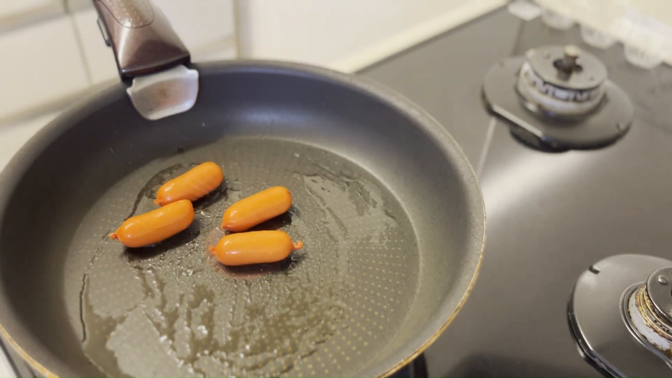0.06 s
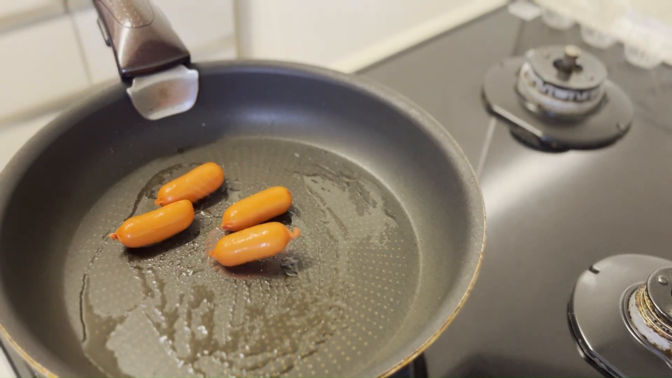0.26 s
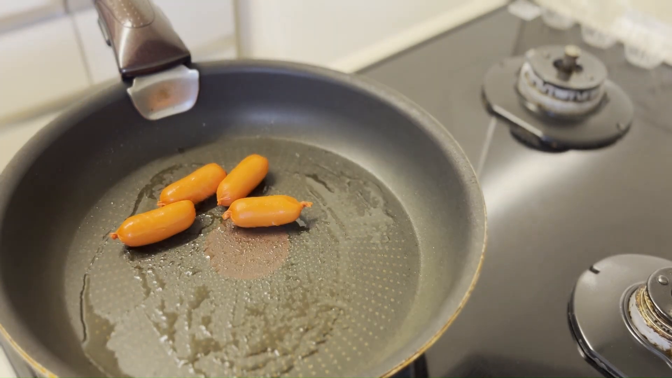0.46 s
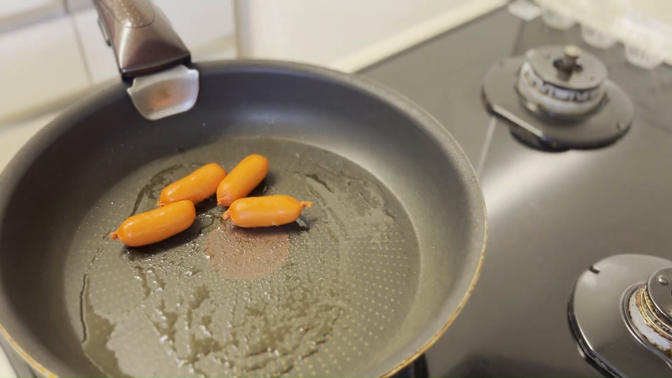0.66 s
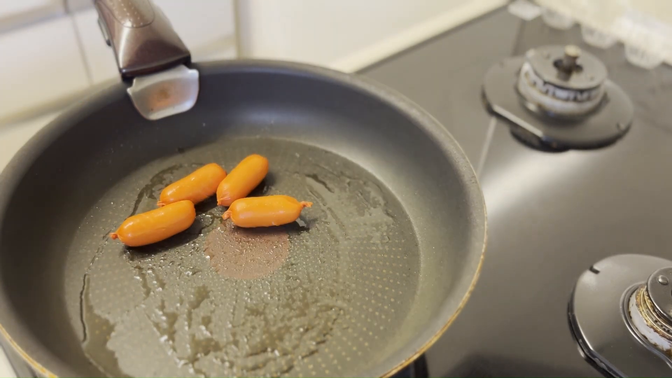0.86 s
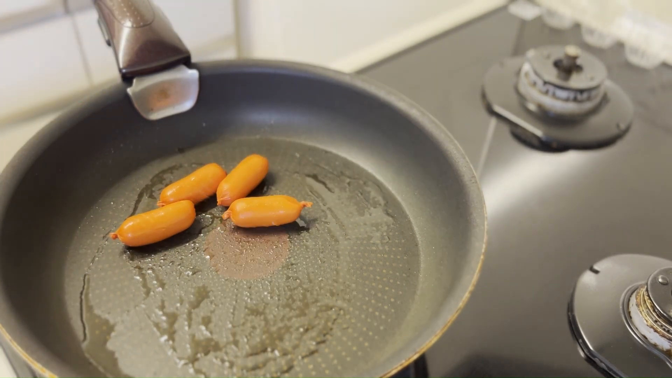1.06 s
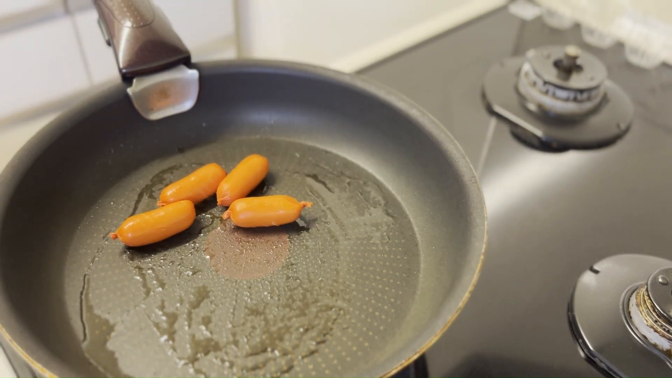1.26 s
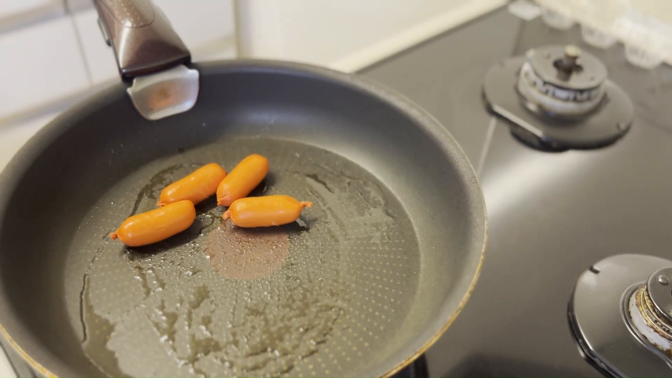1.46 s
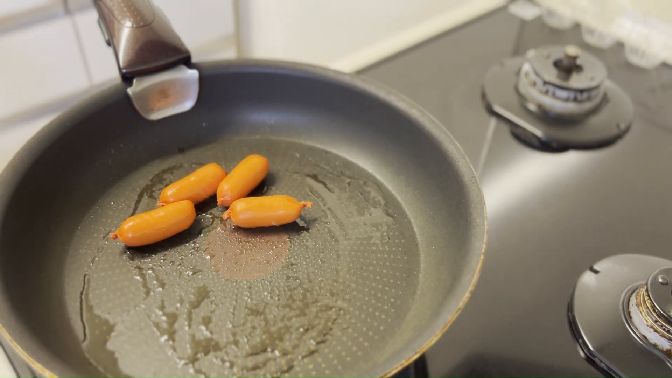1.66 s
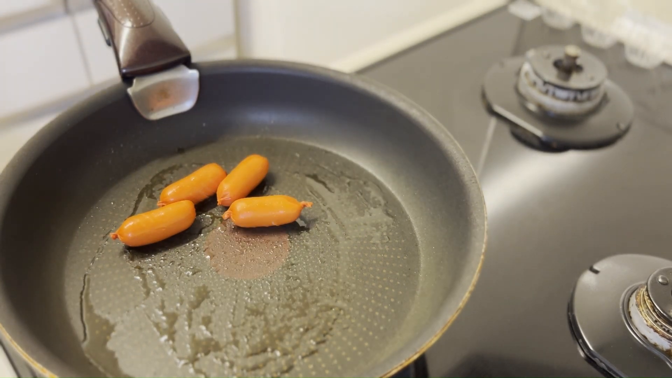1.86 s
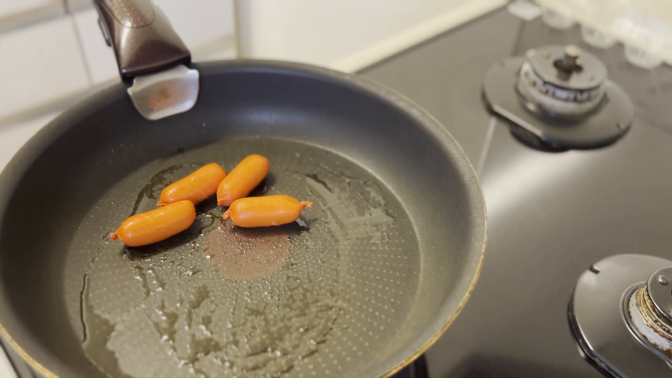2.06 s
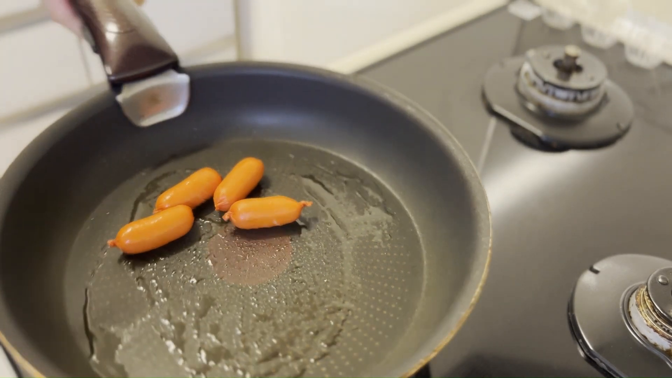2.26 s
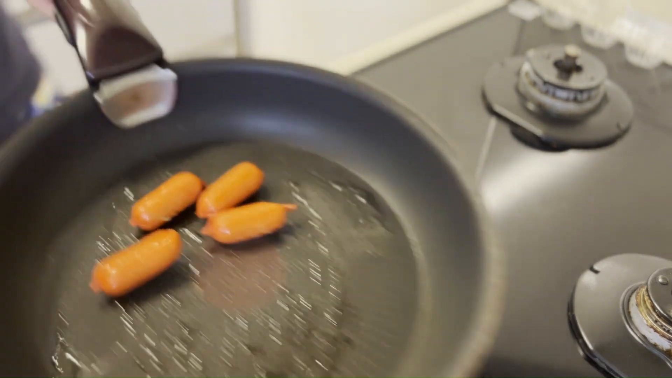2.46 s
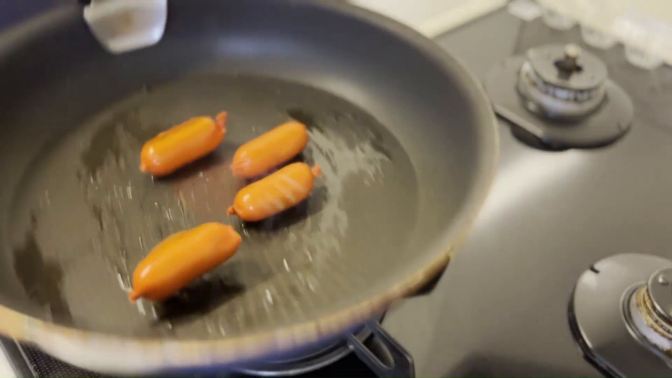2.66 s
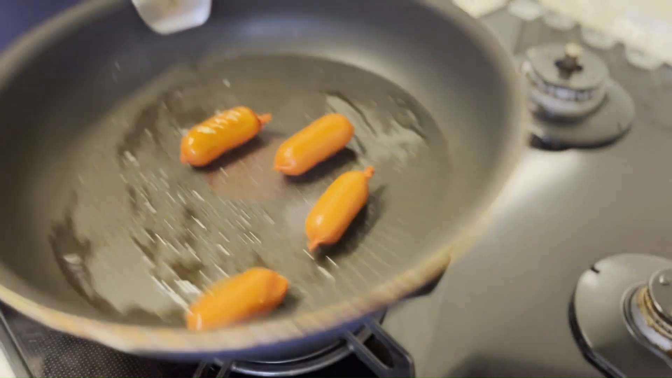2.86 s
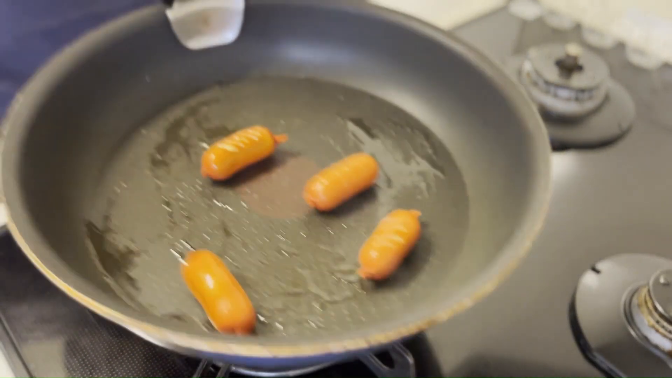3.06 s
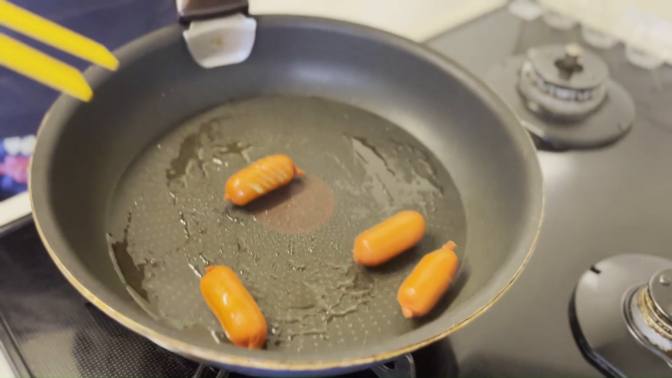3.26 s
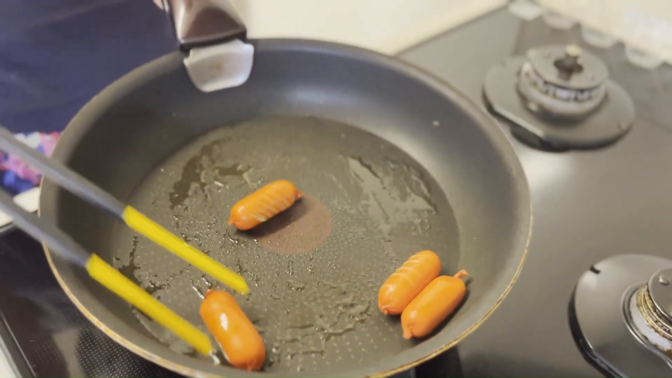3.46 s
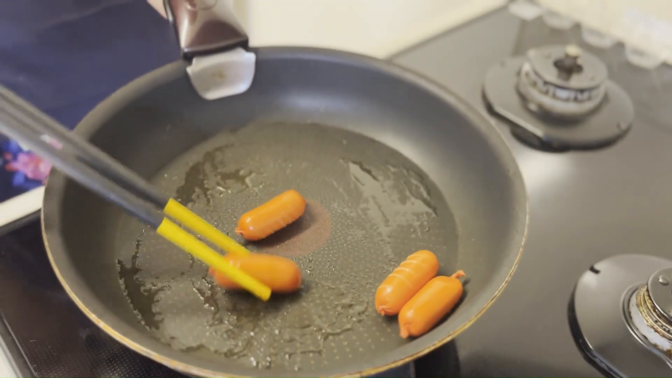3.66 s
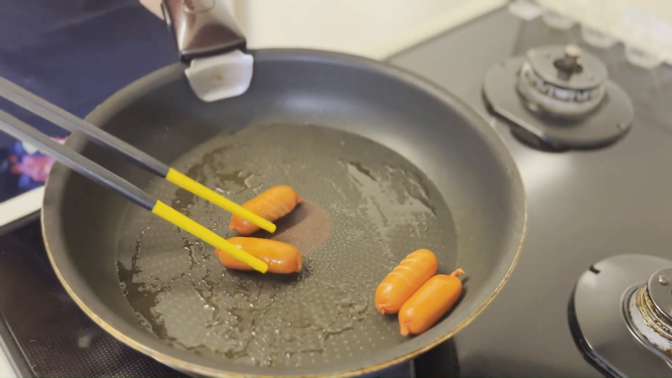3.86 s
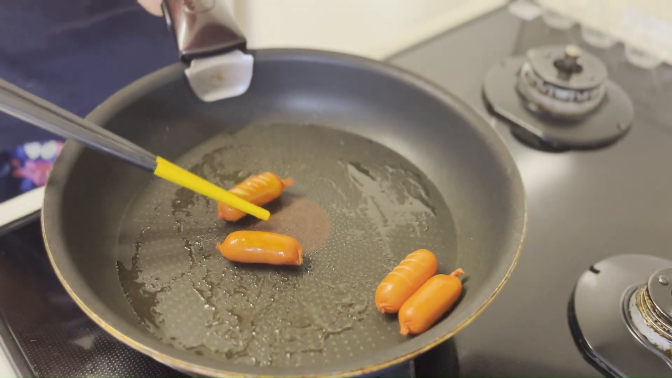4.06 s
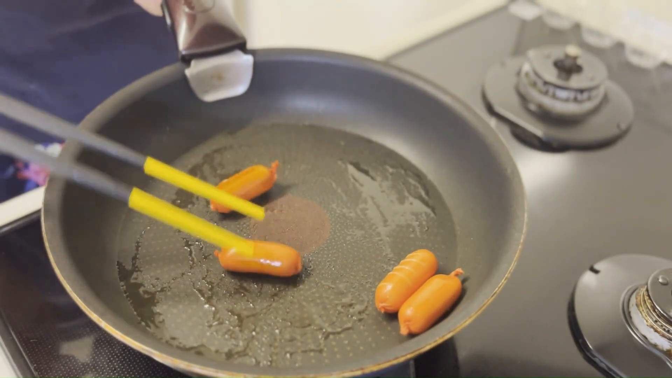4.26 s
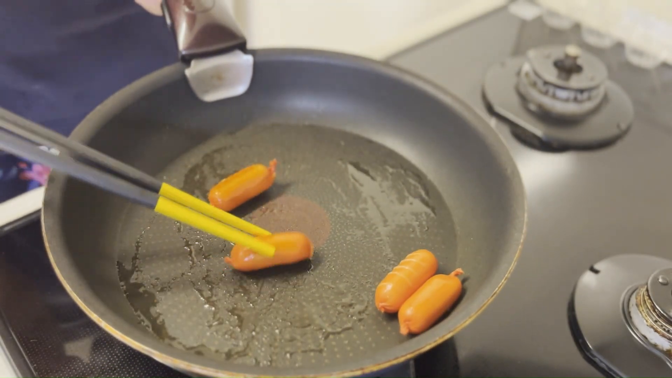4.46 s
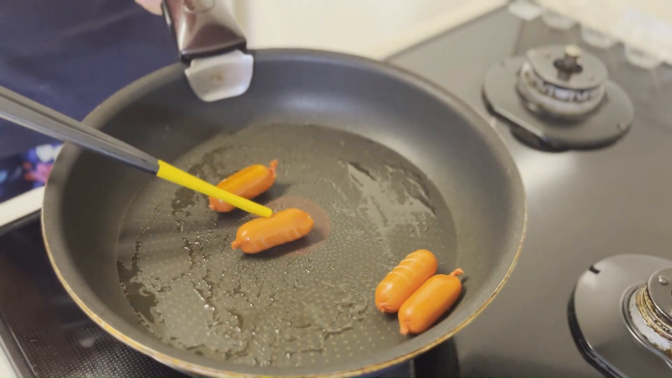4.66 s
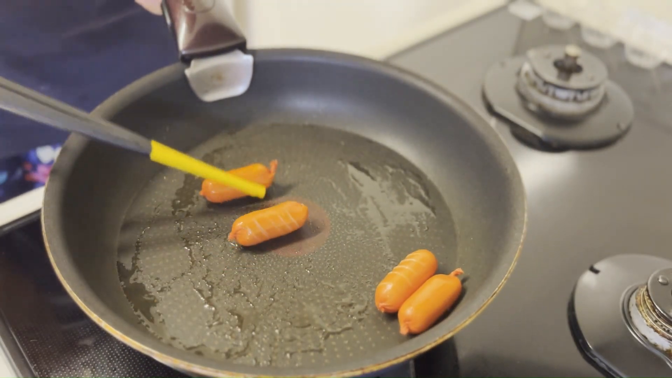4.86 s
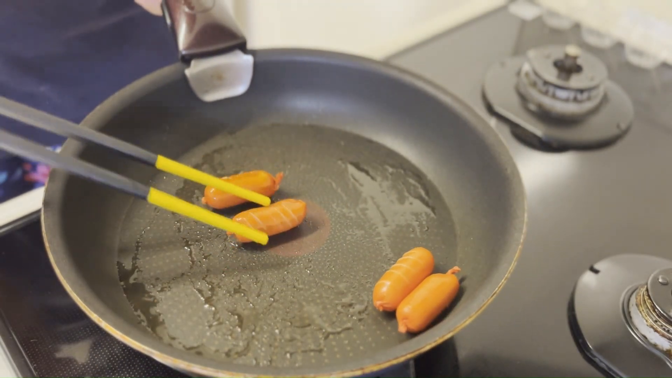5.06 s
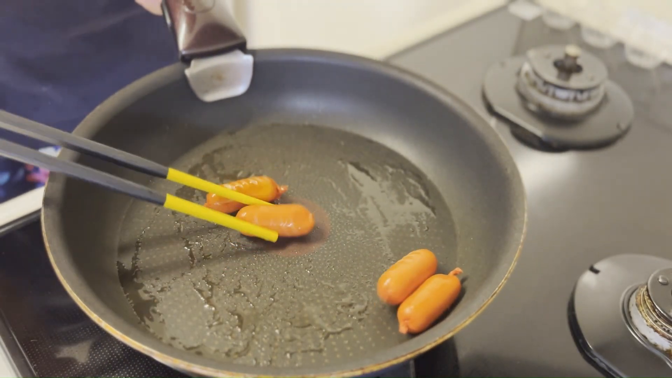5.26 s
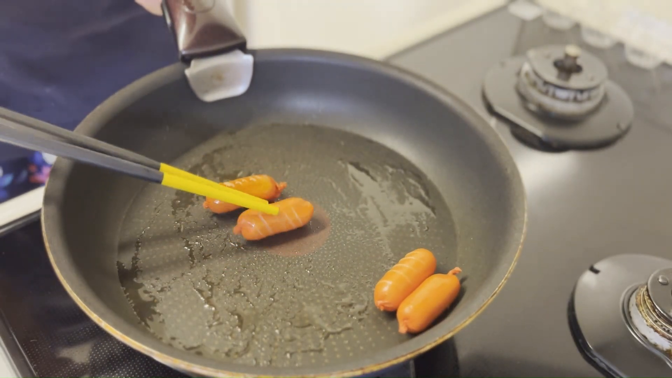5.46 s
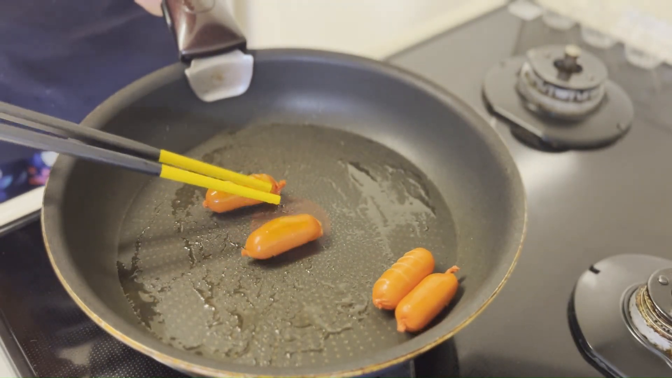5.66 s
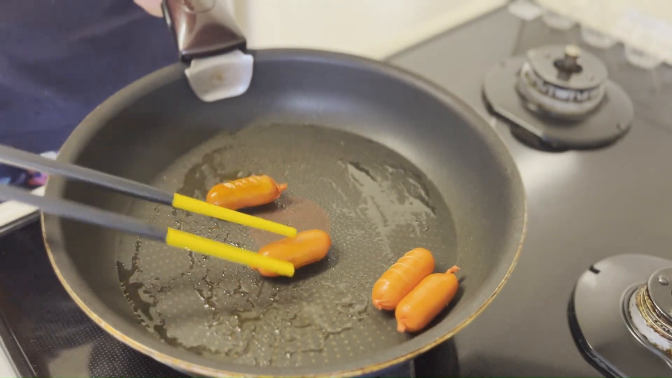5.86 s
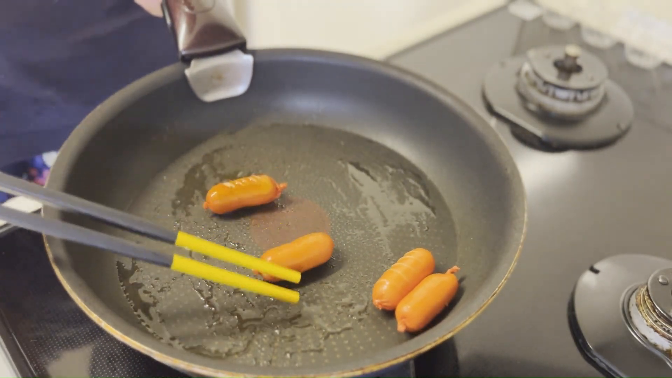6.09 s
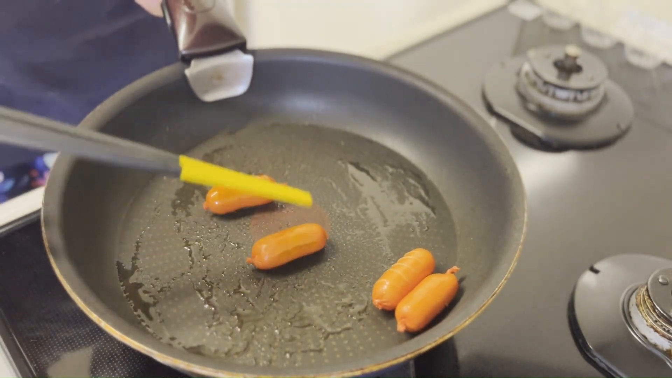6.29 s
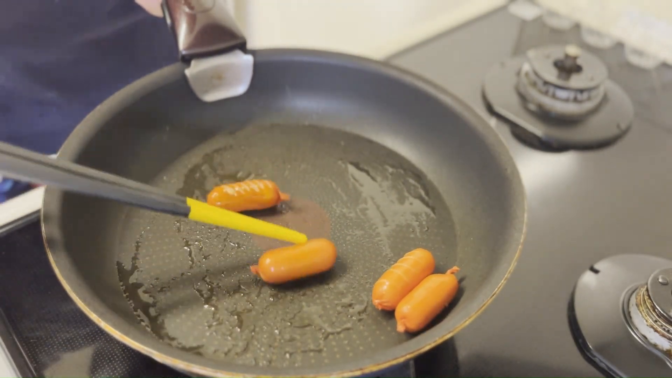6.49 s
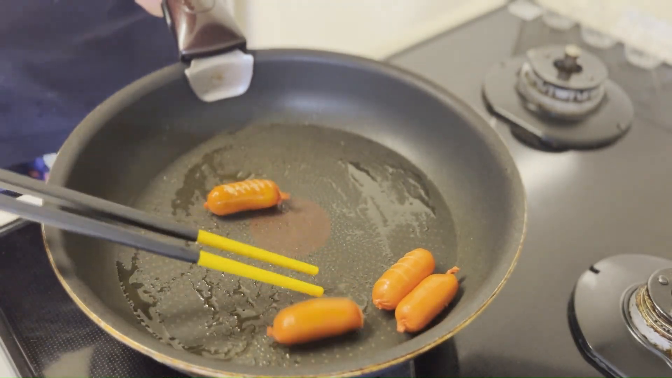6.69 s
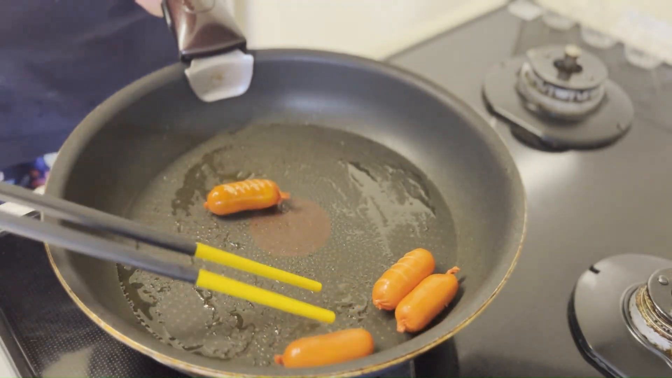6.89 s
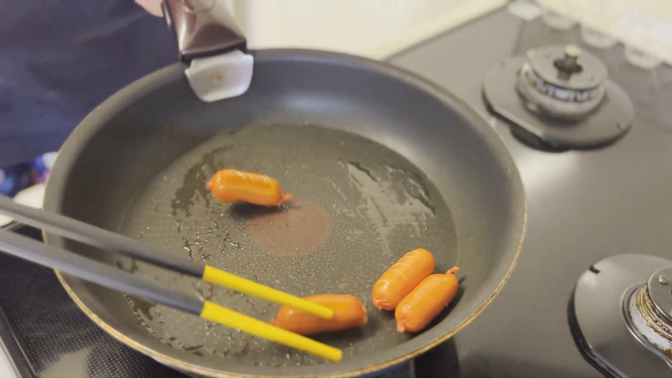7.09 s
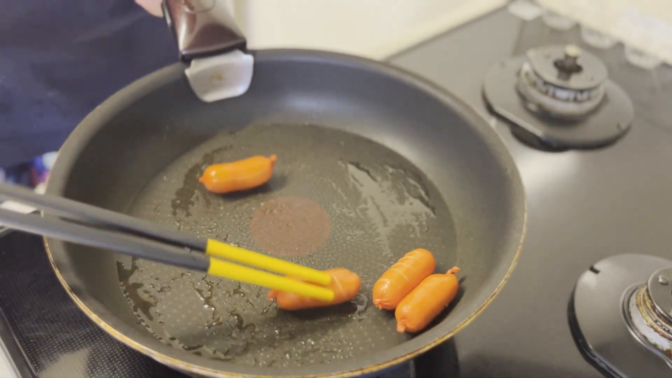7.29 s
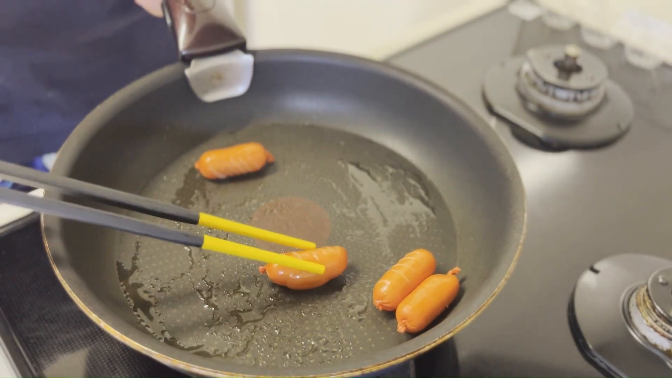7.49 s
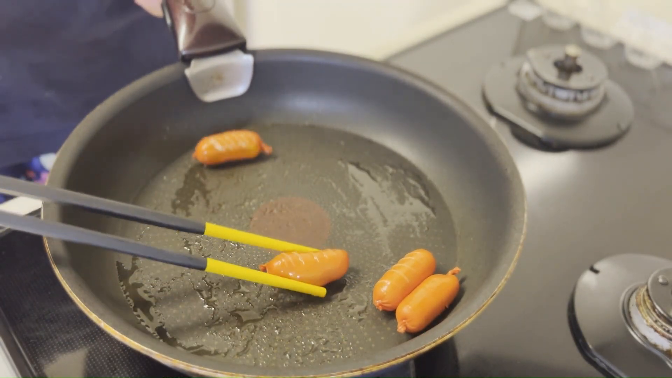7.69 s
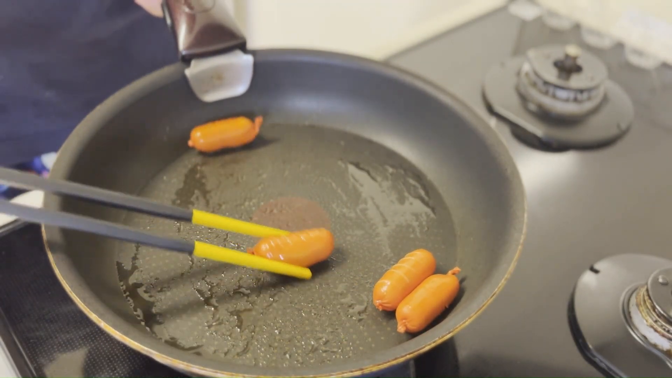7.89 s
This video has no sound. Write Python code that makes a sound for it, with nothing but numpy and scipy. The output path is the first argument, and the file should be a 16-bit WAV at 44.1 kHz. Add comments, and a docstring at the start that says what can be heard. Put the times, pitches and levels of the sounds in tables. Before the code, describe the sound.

Close oil sizzle with sharp snapping spits, dull counter bumps and rumbling scrapes, then a metallic pan clatter and steady crackling frying.

```python
"""Sausages frying in a thin film of oil

Steam bubbles, as short damped sines and noise, make a dense fizz; louder spits are sharp snaps with noisy tails.
The pan is lifted, rocked and set back on its iron trivet: its modes ring with a crack and a rattle.
Bumps boom in the counter's low modes, a dragging rumble and dull scrapes are bands of noise,
and a stand is tapped, a quick falling sweep. Faint tones swell; a low noise of burner and room lies under it all.
Two microphone ports a little apart hear the sound with different phase and level."""
import sys
import numpy as np
from scipy import signal
from scipy.fft import rfft, irfft, next_fast_len
from scipy.io import wavfile
from scipy.ndimage import uniform_filter1d, map_coordinates

SR = 44100
rng = np.random.default_rng(int(sys.argv[2]) if len(sys.argv) > 2 else 0)


def output_pcm(signal):
    """Save a mono or channel-first signal as 16-bit PCM at the path in sys.argv[1].

    Samples are clipped to [-1, 1] before scaling.
    """
    pcm = np.clip(np.atleast_2d(signal).T, -1, 1) * 32767
    wavfile.write(sys.argv[1], SR, np.round(pcm).astype(np.int16))


N = 349713  # length in samples


def amp(db):
    """Decibels to a linear factor."""
    return 10 ** (np.asarray(db) / 20)


def unit(x):
    """Scale to an RMS of one."""
    return x / np.sqrt(np.mean(x ** 2) + 1e-20)


def along(points, hz):
    """Read a curve of (Hz, value) points on a log frequency axis."""
    f, v = np.transpose(points)
    return np.interp(np.log(hz + 1), np.log(f + 1), v)


def curves(rows):
    """One value per sample for each column after the time."""
    s, *cols = np.transpose(rows)
    return [np.interp(np.arange(N) / SR, s, c) for c in cols]


def wobble(rate):
    """A smooth random curve, rate knots a second."""
    knots = rng.standard_normal(int(N * rate / SR) + 4)
    return map_coordinates(knots, [np.arange(N) * rate / SR])


def filtered(x, response):
    """x shaped by a complex response of frequency."""
    m = next_fast_len(N + SR)
    return irfft(rfft(x, m) * response(np.fft.rfftfreq(m, 1 / SR)), m)[..., :N]


def band(x, hz, width):
    """One resonance (Hz, width in Hz), applied twice for steep skirts."""
    return filtered(x, lambda f: (1j * f * width / (hz * hz - f * f + 1j * f * width)) ** 2)


def ringing(modes):
    """The response of a set of (Hz, dB, t60) modes to a small force."""
    def response(f):
        total = 0
        for k, (hz, db, t60) in enumerate(modes):
            width = np.log(1000) / np.pi / t60
            total = total + (-1) ** k * amp(db) * 1j * f * width / (hz * hz - f * f + 1j * f * width)
        return total
    return response


# Colour of the burner and room noise. Each row: frequency in Hz, relative level in dB per Hz.
ROOM_COLOUR = [(12, -55), (20, -13), (80, 2.5), (138, -7), (251, -7), (341, -32), (498, -13), (812, -17.5),
               (1500, -20.5), (1950, -37), (3300, -120)]
ROOM_DB = -66


def kitchen():
    """The steady low noise of burner and room: random noise with a fixed spectrum."""
    noise = rng.standard_normal(N)
    return amp(ROOM_DB) * unit(filtered(noise, lambda hz: amp(along(ROOM_COLOUR, hz))))


# Force of the drag on the counter. Each row: time in seconds, rumble level in dB.
DRAG_RUMBLE = [(0.0, -73), (0.24, -64.5), (0.47, -65), (0.82, -59.5), (0.98, -52.5), (1.2, -49.5),
               (1.45, -49.5), (1.62, -54.5), (1.77, -52), (2.05, -61.5), (2.29, -70), (2.42, -51.5),
               (2.51, -59), (2.97, -69), (3.4, -73), (3.6, -55.5), (3.89, -61.5), (4.2, -71)]
HARD_DRAG_DB = -51.5  # rumble level of a hard drag
DRONE_DB, DRONE_GROWS = -49.5, 1.95  # level at a hard drag; dB per dB of rumble
SCUFF_DB, SCUFF_GROWS = -65, 0.59  # the same for the scuff
DRONE_HZ, DRONE_SINKS_HZ, SINK_FROM_S, SINK_S = 242.7, 214.5, 1.05, 0.55


def dragging():
    """Something slides on the counter: lumpy rumble, drone and scuff, faded out by the last row."""
    seconds = np.arange(N) / SR
    fade = np.clip((DRAG_RUMBLE[-1][0] - seconds) / 0.35, 0, 1)
    rumble_db, = curves(DRAG_RUMBLE)
    over_db = rumble_db - HARD_DRAG_DB
    slip_db = 2.6 * wobble(22)
    noise = rng.standard_normal((3, N))
    rumble = unit(band(noise[0], 81.0, 114))
    # the drone crossfades from the upper band to the lower
    sunk = np.clip((seconds - SINK_FROM_S) / SINK_S, 0, 1)
    drone = unit((1 - sunk) * band(noise[1], DRONE_HZ, 44) + sunk * band(noise[1], DRONE_SINKS_HZ, 43))
    scuff = unit(band(noise[2], 593, 570))
    out = amp(rumble_db + slip_db) * rumble
    out += amp(DRONE_DB + DRONE_GROWS * over_db + 0.79 * slip_db) * drone
    out += amp(SCUFF_DB + SCUFF_GROWS * over_db + slip_db) * scuff
    return fade * out


# Dull scrapes on the counter. Each row: start in seconds, relative level in dB, t60 in seconds.
SCRAPES = [(0.503, -34.5, 0.33), (0.959, -55, 0.24), (1.075, -45.5, 0.28), (1.207, -41, 0.3),
           (2.192, -51, 0.94), (2.31, -42, 0.76)]


def scuffs():
    """A woody scrape: a flickering burst of noise in two low-middle bands."""
    out, t = np.zeros(N + SR), np.arange(SR // 2) / SR
    for s, db, t60 in SCRAPES:
        level_db = db + 6.5 - 60 * (t / t60) ** 1.18 + 2.1 * wobble(349.5)[:len(t)]
        out[round(s * SR):][:len(t)] += amp(level_db) * rng.standard_normal(len(t))
    return band(out[:N], 590, 456) + 0.64 * band(out[:N], 926, 850)


# Soft blows. Each row: start in seconds, relative level in dB, relative level of the upper boom in dB,
# relative level of the rattle in dB, t60 in seconds (the boom's at 150 Hz).
BLOWS = [(0.025, -30.5, -8.5, -19.5, 0.35), (0.539, -56, 5.5, -28, 0.24), (1.683, -26.5, -9.5, -21.5, 0.39),
         (1.828, -34.5, -29, -20, 0.19), (2.524, -34, -5.5, -19.5, 0.39), (2.925, -41, -10, -37, 0.3)]
# Low modes of the counter. Each row: frequency in Hz, relative level in dB.
COUNTER_MODES = [(52, -0.5), (85, -0.5), (105, -1.5), (150, 6.5), (198, 5.5), (255, -5.5)]


def bumps():
    """Soft blows boom in the counter's low modes, the deepest rising slowest, and shake what stands on it."""
    out, t = np.zeros(N + SR), np.arange(SR) / SR
    for s, db, upper_db, rattle_db, t60 in BLOWS:
        boom = 0
        for hz, level in COUNTER_MODES:
            start_db = level + rng.normal(0, 0.28) + (upper_db + 5.0) * (hz > 120)
            envelope = amp(start_db - 60 * t / t60 * (hz / 150) ** 0.47) * (1 - np.exp(-t * hz / 0.79))
            drift = np.cumsum(rng.normal(0, 0.034, SR))
            boom = boom + envelope * np.sin(2 * np.pi * hz * t + drift)
        noise = rng.standard_normal(SR)
        shake = uniform_filter1d(noise, size=9) - uniform_filter1d(noise, size=80) + 1.02 * noise
        shake *= amp(2.1 * wobble(65)[:SR]) * amp(-60 * t / t60) * (1 - np.exp(-t / 0.025))
        out[round(s * SR):][:SR] += amp(db - 1.5) * (boom + amp(rattle_db + 12.5) * shake)
    return out[:N]


# Light taps on the stand. Each row: start in seconds, level in dB.
STAND_TAPS = [(2.787, -48), (5.318, -52.5), (6.86, -43)]


def taps():
    """A bending wave runs up the stand, high pitches first: a quick falling sweep."""
    out, t = np.zeros(N + SR), np.arange(SR // 10) / SR
    sweep = np.sin(2 * np.pi * 1.525 * np.log(1 + t / 0.0014))
    sweep *= (1 - np.exp(-t / 0.0011)) * np.exp(-(t / 0.043) ** 2)
    for s, db in STAND_TAPS:
        out[round(s * SR):][:len(t)] += amp(db) * sweep
    return out[:N]


# Modes of something glassy. Each row: frequency in Hz, relative level in dB, t60 in seconds.
GLASS_MODES = [(5200, 2, 0.039), (7540, 4.5, 0.042), (8070, 2, 0.093), (9340, 6, 0.098)]
TINK_S, TINK_DB = 3.4068, -32


def tink():
    """A few high glassy modes set off by one light tick."""
    t = np.clip(np.arange(N) / SR - TINK_S, 0, 1)
    return sum(amp(TINK_DB + db - 60 * t / t60) * np.sin(2 * np.pi * hz * t) for hz, db, t60 in GLASS_MODES)


# Metal contacts. Each row: start in seconds, relative level in dB, relative brightness in dB,
# t60 of the rattle in seconds (twice this caps the ring's), relative level of the ring in dB.
CONTACTS = [(0.026, -24.5, -56, 0.21, -6.5), (2.242, -19, -8.5, 0.23, -1), (3.4085, -29, -2, 0.026, -27),
            (3.42, -17, -10, 0.13, -5), (3.521, -16.5, -13.5, 0.064, -8.5), (3.596, -23.5, -12, 0.22, -2),
            (3.756, -33, -13, 0.15, -0.5), (5.239, -38.5, -15, 0.085, -20), (6.333, -43, -17, 0.35, 3.5)]
# Modes of the pan. Each row: frequency in Hz, relative level in dB, longest t60 in seconds.
PAN = [(199, -1, .3), (576, -2, .09), (850, -3, .08), (1130, -2, .14), (1280, -5, .08), (1835, 3, .13),
       (2078, -6, .09), (2735, -2, .12), (3275, -4, .13), (3800, -2, .14), (680, -5, .08), (2880, -4, .1),
       (4300, -8, .08), (4950, -9, .08)]
THUD_HZ, THUD_DB, THUD_T60 = 816, 7.5, 0.032  # dull knock under each contact: centre, relative level, t60 in s


def clanks():
    """Pan against trivet or chopsticks: pan modes at new strengths, a crack, a thud and a rattle of loose iron."""
    out, t = np.zeros(N + SR), np.arange(SR // 2) / SR
    for s, db, bright_db, t60, ring_db in CONTACTS:
        ring = 0
        for hz, level, life in PAN:
            start_db = level + rng.normal(0, 1.6) + (bright_db + 14) * hz / 6000
            drift = np.cumsum(rng.normal(0, .021, len(t)))  # a small random drift of phase roughens each tone
            decay_db = -60 * t / np.minimum(life, 2.0 * t60)
            ring = ring + amp(start_db + decay_db) * np.sin(2 * np.pi * hz * t + drift)
        noise = rng.standard_normal(len(t))
        dull = uniform_filter1d(noise, size=14) - uniform_filter1d(noise, size=90)
        rattle = 0.88 * dull + amp(bright_db + 19.0) * uniform_filter1d(noise, size=6)
        rattle *= amp(-60 * t / t60) + 0.39 * amp(-60 * t / 0.015)
        crack = 3 * noise * amp(bright_db - 60 * t / 0.033)
        thud = amp(THUD_DB - 60 * t / THUD_T60) * np.sin(2 * np.pi * THUD_HZ * rng.normal(1, 0.072) * t)
        contact = amp(ring_db) * ring + 1.44 * rattle + crack + thud
        out[round(s * SR):][:len(t)] += amp(db - 16.5) * contact * (1 - np.exp(-t / 0.00065))
    return out[:N]


# Faint tones, each swelling for a moment. Each row: time of the peak in seconds, frequency in Hz,
# relative level in dB, rise in seconds.
TONE_SWELLS = [(0.21, 2740, -56, .008), (0.731, 4650, -55, 0.014), (2.391, 2730, -60, .05),
               (2.42, 574, -60.5, 0.087), (2.42, 1854, -64, .06), (2.35, 201.4, -53, 0.058),
               (3.159, 2735, -55, 0.044), (3.624, 3790, -45, .022), (4.03, 1140, -64, .03),
               (4.42, 1140, -64, .04), (0.54, 612, -55, 0.024), (5.471, 1130, -67, 0.025),
               (6.07, 2740, -58, .03), (6.178, 2740, -54, 0.015), (6.299, 2720, -58.5, .03),
               (6.169, 1140, -67, 0.0395), (6.358, 1140, -65, 0.044), (6.453, 1153, -58.5, 0.026),
               (6.56, 1140, -61, 0.026), (6.61, 2715, -57, 0.036), (7.118, 2740, -63, 0.038),
               (7.239, 2760, -61, .05), (7.141, 1144, -66.5, 0.073), (7.32, 1140, -73, 0.04)]


def swells():
    """Single faint tones swell and fade, with a drifting phase and an unsteady level."""
    out, t = np.zeros(N + SR), np.arange(SR // 2) / SR
    for s, hz, db, rise in TONE_SWELLS:
        u = t / rise
        drift = np.cumsum(rng.normal(0, 0.04, len(t)))
        tone = np.sin(2 * np.pi * hz * t + drift) * amp(3 * wobble(70)[:len(t)] - 2)
        out[round((s - rise) * SR):][:len(t)] += np.sqrt(2) * amp(db) * (u * np.exp(1 - u)) ** 2 * tone
    return out[:N]


# How hard the oil boils. Each row: time in seconds, level in dB.
BOILING = [(0.0, -56.5), (0.09, -57), (0.66, -60), (0.9, -57), (1.19, -60), (2.21, -62), (2.3, -55),
           (2.43, -49), (2.74, -48), (3.18, -51), (3.36, -49.5), (3.56, -48), (3.77, -47.5), (4.13, -51),
           (4.46, -50), (6.47, -51.5), (6.78, -50), (7.42, -49.5), (7.66, -56), (7.93, -52)]
FULL_BOIL_DB = -49.5


def boil():
    """How far the oil is from a full boil, in dB."""
    return curves(BOILING)[0] - FULL_BOIL_DB


def bubbles(count, spread_db, low_hz, high_hz, cycles):
    """Bursting bubbles at random times: short damped sines, most of them small, a few large."""
    when, pitch, size = rng.random((count, 3)).T
    hz = low_hz * (high_hz / low_hz) ** pitch
    t = np.arange(64) / SR
    grain = np.sin(2 * np.pi * hz[:, None] * t) * np.exp(-t * hz[:, None] / cycles)
    grain *= amp(-spread_db * np.log(size + 4e-3))[:, None]
    at = (when * N).astype(int)[:, None] + np.arange(len(t))
    return unit(np.bincount(at.ravel(), grain.ravel(), N + len(t))[:N])


def patchy(x, patchy_db):
    """Random patches of gain a couple of hundred Hz wide and a twentieth of a second long."""
    z = signal.stft(x, nperseg=512)[2]
    field = uniform_filter1d(rng.standard_normal(z.shape), size=2, axis=0)
    field = uniform_filter1d(field, size=9, axis=1)
    return signal.istft(z * amp(patchy_db * unit(field)), nperseg=512)[1][:N]


# Filters on the bubbles: fine fizz, airy spray, lower simmer. Each row: frequency in Hz, relative gain in dB.
FIZZ_COLOUR = [(1500, -25.5), (3000, 2.5), (5000, -15.5), (7000, -0.5), (8500, 1.5), (11000, -2.5),
               (13000, -10), (16000, 5)]
SPRAY_COLOUR = [(6000, -33), (10000, -5), (13000, 0), (16000, -3)]
SIMMER_COLOUR = [(300, -0.5), (800, -5.5), (1500, 2.5), (3000, -1), (3600, 6.5), (4000, 11), (4500, 10.5),
                 (5050, 11), (5350, 10.5), (5700, 17.5), (6200, 12.5), (8000, 9.5), (14000, -49)]
# Pan modes kept alive by the fizz. Each row: mode (Hz, relative dB, t60 in seconds),
# level in dB at a full boil, growth in dB per dB of boiling.
SINGING_MODES = [(PAN[3], -72.5, 0.63), (PAN[7], -67.5, 1.1), (PAN[5], -77.5, 1)]
# level at a full boil; dB per dB of boiling
FIZZ_DB, FIZZ_GROWS = -52.5, 0.5
SPRAY_DB, SPRAY_GROWS = -45.5, 1.85
SIMMER_DB, SIMMER_GROWS = -51.5, 1


def frying():
    """Fine bubbles fizz in clumps over a hiss of steam; larger ones simmer lower; the pan rings in short blips."""
    boil_db = boil()
    clump_db = 0.55 * wobble(14) + 1.2 * wobble(60)
    fine = bubbles(count=30000, spread_db=5.0, low_hz=5600, high_hz=15900, cycles=0.3)
    fine += rng.standard_normal(N)  # hiss of steam
    coarse = 0.82 * bubbles(count=16000, spread_db=5.5, low_hz=1210, high_hz=6140, cycles=0.38)
    coarse += 1.77 * rng.standard_normal(N) + 0.37 * fine
    fizz = filtered(patchy(fine, patchy_db=4.0), lambda hz: amp(along(FIZZ_COLOUR, hz)))
    spray = filtered(fine, lambda hz: amp(along(SPRAY_COLOUR, hz)))
    simmer = filtered(patchy(coarse, patchy_db=2.1), lambda hz: amp(along(SIMMER_COLOUR, hz)))
    simmer_clump_db = 1.75 * clump_db + 0.75 * wobble(120)
    out = amp(FIZZ_DB + FIZZ_GROWS * boil_db) * unit(amp(clump_db) * fizz)
    out += amp(SPRAY_DB + SPRAY_GROWS * boil_db) * unit(amp(clump_db) * spray)
    out += amp(SIMMER_DB + SIMMER_GROWS * boil_db) * unit(amp(simmer_clump_db) * simmer)
    for mode, db, grows in SINGING_MODES:
        push = amp(2.2 * wobble(30)) * rng.standard_normal(N)
        out += amp(db + grows * boil_db) * unit(filtered(push, ringing([mode])))
    return out


# Small spits in between: level at a full boil, dB per dB of boiling, spread of level, body of the thinnest
SMALL_DB, SMALL_GROWS, SMALL_SPREAD, SMALL_BODY_DB = -37.5, 0.39, 1, -26


def small_spits(count):
    """Rows of weak spits at random times, louder as the oil boils harder, some thin and some full."""
    when, size, full = rng.random((count, 3)).T
    db = SMALL_DB + SMALL_GROWS * boil()[(when * N).astype(int)] - SMALL_SPREAD * np.log(size + .12)
    return list(zip(when * N / SR, db - 8 * full ** 3, SMALL_BODY_DB + 16 * full ** 3))


# Single spits. Each row: start in seconds, level in dB, relative level of the low body in dB.
SINGLE_SPITS = [(0.0356, -24, -3.5), (0.096, -41, 7.5), (0.205, -40, -0.5), (0.2894, -28.5, -13),
                (0.321, -38.5, -1), (0.405, -31, -3.5), (0.4332, -27.5, -10), (0.452, -34, -2),
                (0.7183, -18, -51), (1.069, -30, -24), (1.1712, -33, -29), (1.2, -33.5, -12.5),
                (1.2478, -27.5, -33), (1.2808, -27.5, -40), (1.333, -28, -32), (1.3485, -29, -21),
                (1.4398, -33, -40), (2.0076, -32.5, -20), (2.1053, -32.5, -26), (2.1818, -36, -34),
                (2.584, -19.5, -23), (2.6472, -34.5, -3.5), (2.6736, -34, -5), (2.7881, -21.5, -24),
                (2.8114, -31.5, -0.5), (2.8416, -17.5, -13.5), (2.8958, -21, -16), (2.9725, -26, -10),
                (3.0207, -27.5, -16), (3.1333, -25, -29), (3.182, -37.5, -15), (3.307, -21.5, -3.5),
                (3.3468, -44, -36), (3.4943, -23, -29), (3.589, -22, -25), (3.6836, -24.5, -14),
                (3.733, -37, -35), (3.749, -27, -27), (3.79, -32, -25), (3.813, -23.5, -16),
                (3.8955, -31, 1.5), (3.9889, -21, -22), (4.064, -34, -13), (4.113, -28.5, -7.5),
                (4.3156, -27.5, -21), (4.368, -34, -12), (4.3939, -41.5, -0.5), (4.4618, -34, -19),
                (4.7092, -34, -13), (4.814, -26, -23), (4.8364, -35.5, -5), (4.8953, -35.5, -7.5),
                (5.1632, -34, -6), (5.2191, -40.5, 0), (5.3169, -20, -33), (5.4796, -30.5, -6),
                (5.5368, -36.5, -10), (5.6301, -39, -16), (5.6998, -20.5, -15.5), (5.8455, -27.5, -14.5),
                (6.011, -29, -21), (6.0242, -30, -10.5), (6.1031, -30, -18), (6.125, -29, -26),
                (6.1629, -43, 1), (6.3, -31.5, -12), (6.333, -26, -10.5), (6.5832, -22, -12.5),
                (6.7007, -26.5, -17), (6.7576, -33.5, -9.5), (6.8329, -32, -14), (6.9985, -31, -26),
                (7.0584, -25.5, -15.5), (7.1427, -39, -26), (7.1644, -25, -16), (7.22, -23, -16),
                (7.3223, -29.5, -7), (7.4295, -24, -15), (7.4859, -23.5, -14), (7.5647, -23.5, -14),
                (7.643, -27.5, -4)]
SNAP_HZ, SNAP_SCATTER, THIN_HZ = 9110, 0.14, 14300  # snap's middle pitch, relative scatter, thin upper edge


def spits():
    """A pocket of water bursts: a sharp snap of a cycle or two, a duller body and a faint spray after it."""
    out, t = np.zeros(N + SR), np.arange(SR // 20) / SR
    from_snap = t - .0009  # seconds from the middle of the snap
    for s, db, body_db in list(SINGLE_SPITS) + small_spits(count=420):
        a, b = rng.standard_normal((2, len(t)))
        hz = SNAP_HZ * np.exp(SNAP_SCATTER * rng.standard_normal())
        snap = 1.27 * np.cos(2 * np.pi * hz * from_snap)
        snap += 0.5 * rng.random() * np.cos(2 * np.pi * THIN_HZ * from_snap)
        snap *= np.exp(-(np.abs(from_snap) / 0.00013) ** 1.44)
        # spray and body each have a short burst and a long faint tail
        spray = np.diff(a, prepend=0)
        spray *= amp(-14.0 - 60 * np.abs(from_snap) / 0.0096) + amp(-22.5 - 60 * t / 0.25)
        body = 1.01 * (uniform_filter1d(b, size=3) - uniform_filter1d(b, size=24))
        body *= amp(-60 * np.abs(t - .0012) / 0.0089) + amp(-14.0 - 60 * t / 0.45)
        pop = 0.78 * np.sin(2 * np.pi * hz * 0.25 * t) * amp(-60 * np.abs(from_snap) / 0.0024)
        out[round(s * SR):][:len(t)] += amp(db) * (snap + spray + amp(body_db) * (body + pop))
    return out[:N]


# Decay of the walls' answer. Each row: frequency in Hz, t60 in seconds.
WALL_DECAY = [(150, .4), (1000, .25), (3000, .13), (12000, .06)]


def walls(x):
    """Each frequency of the tiled walls' answer dies at its own speed, differently at each port."""
    hz, t, z = signal.stft(rng.standard_normal((2, SR // 2)), SR, nperseg=256)
    tail = signal.istft(z * amp(-60 * t / along(WALL_DECAY, hz)[:, None]), SR, nperseg=256)[1]
    tail /= np.linalg.norm(tail[0])
    late = np.pad(x, (130, 0))  # 3 ms on the way
    return signal.fftconvolve(late[None], tail, axes=1)[:, :N]


# Likeness of the ports. Each row: frequency in Hz, left-right likeness from 0 to 1.
LIKENESS = [(120, 0.97), (400, 0.65), (1000, 0.33), (2800, 0.3), (4500, 0.86), (6500, 0.55), (8500, 1),
            (10500, 0.57), (12500, 1), (15000, 0.69)]


def spread(x):
    """What the ports do not share keeps the same bursts but arrives with scattered phases."""
    def split(hz):
        turn = np.arccos(np.clip(along(LIKENESS, hz), 0, 1)) / 2
        return np.array([np.cos(turn), np.sin(turn)])
    mid, side = filtered(x, split)
    z = signal.stft(side, nperseg=192)[2]
    scattered = signal.istft(z * np.exp(2j * np.pi * rng.random(z.shape)), nperseg=192)[1][:N]
    scattered = scattered * np.linalg.norm(side) / np.linalg.norm(scattered)
    return np.array([mid + scattered, mid - scattered])


# Phase between the ports. Each row: frequency in Hz, lead of the left port in radians.
LEFT_LEAD = [(100, 0), (2200, 0), (4400, -1.1), (4900, -.6), (5500, 2.3), (6400, 3), (8400, 6.2),
             (9300, 6.4), (12000, 9.2), (12900, 9.5), (16000, 12.5)]
# Level between the ports. Each row: frequency in Hz, left minus right in dB.
LEFT_TILT = [(100, -1.5), (1500, -1.5), (3200, -0.5), (4000, -7), (5700, -5.5), (7200, 0.5), (16000, 0)]


def ports(pair):
    """The two ports differ in arrival phase and in level, half the difference to each."""
    def response(hz):
        difference = 1j * along(LEFT_LEAD, hz) + np.log(amp(along(LEFT_TILT, hz)))
        return np.exp(np.outer([.5, -.5], difference))
    return filtered(pair, response)


def scene():
    """Lay all sources over the two ports and add the walls' answer."""
    metal = clanks() + tink()
    low = bumps() + dragging() + scuffs()
    spit = spits()
    direct = frying() + kitchen() + spit + metal + low + taps()
    near = ports(spread(direct) + swells())  # swells start out alike in both ports
    return near + amp(-10.0) * walls(metal) + amp(-30) * walls(low) + amp(-12) * walls(spit)


# Overall tone colour. Each row: frequency in Hz, gain in dB.
TONE_COLOUR = [(20, -18), (48, -1.5), (11600, -1), (12500, -4.5), (13400, -1.5), (15750, -4), (15950, -42)]
TOP_HZ = 16900


def record(dry):
    """The sound falls away steeply just below 16 kHz; nothing is kept above TOP_HZ."""
    return filtered(dry, lambda hz: amp(along(TONE_COLOUR, hz)) * (hz < TOP_HZ))


dry = scene()
out = record(dry)
output_pcm(out)
```